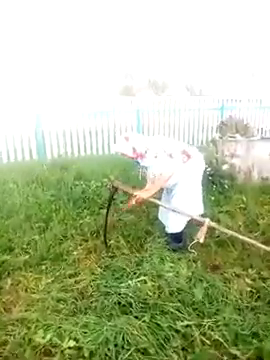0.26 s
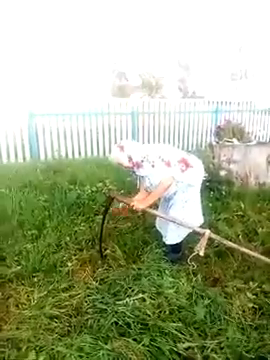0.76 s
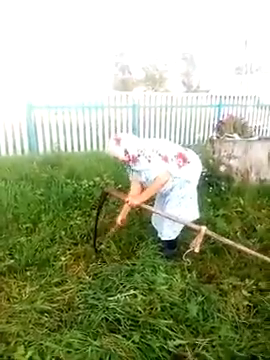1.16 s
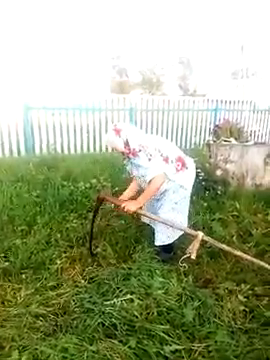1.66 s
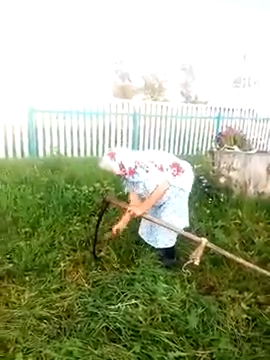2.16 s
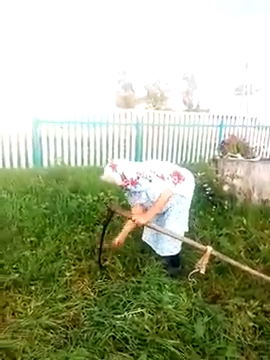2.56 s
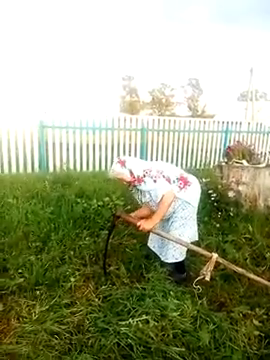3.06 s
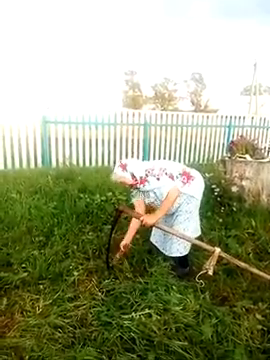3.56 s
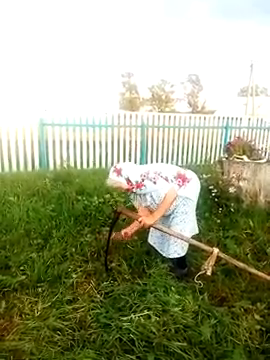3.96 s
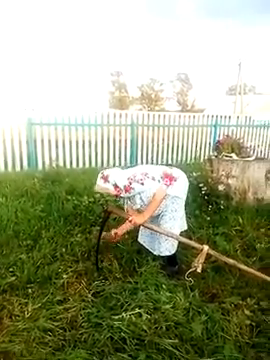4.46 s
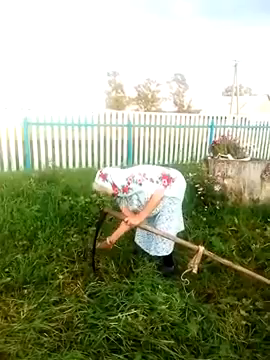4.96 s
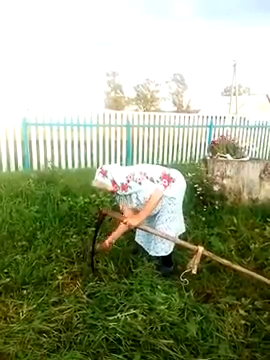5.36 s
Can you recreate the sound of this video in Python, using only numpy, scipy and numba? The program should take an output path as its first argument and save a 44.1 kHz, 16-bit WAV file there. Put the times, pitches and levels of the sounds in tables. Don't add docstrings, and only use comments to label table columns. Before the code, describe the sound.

A whetstone sharpens a hand-held scythe blade in an open yard, heard from a few metres away on a phone. A soft clack opens at 0 s, with small bounces and short scrapes; a faint touch follows at 0.5 s. Firmer clacks come at about 1.0 and 2.0 s, with a mellow touch and rattling snags at 1.5 s between them. The hardest clack lands at 2.5 s, leading into a longer gritty rasp. A dull touch at 3.1 s, a scrape near 3.4 s, a medium clack at 4.0 s and a light one at 4.6 s follow, then several quick scrapes until 5.6 s. The steel gives a short, damped, high ring. Faint brushing passes fill some gaps; a bright tap sounds at 1.3 s, soft dull ones at 3.6 s and a low thud at 4.5 s. Quiet rumble, hiss and distant engine hum continue beneath, with short dull echoes.

```python
import sys
import numpy as np
from scipy import signal
from scipy.fft import rfft, irfft, next_fast_len
from scipy.io import wavfile
from numba import njit

SR = 44100
rng = np.random.default_rng(int(sys.argv[2]) if len(sys.argv) > 2 else 0)


def level_to_linear(level):
    exponent = np.asarray(level, float) / 20
    return 10 ** exponent


def to_wav(s):
    ch = np.atleast_2d(s).T
    pcm = np.round(np.clip(ch, -1, 1) * 32767)
    wavfile.write(sys.argv[1], SR, pcm.astype(np.int16))


N = 247401

# (frequency [Hz], level [dB])
YARD_SPECTRUM = [(22, -10), (40, -10), (80, 2.5), (200, -2.5), (500, -7.5), (950, -10.5), (1300, -15.5),
                 (2000, -16), (4000, -22.5), (6600, -24), (7800, -34), (13500, -40), (14600, -31),
                 (15700, -25)]
# (time [s], level [dB])
RUMBLE_SWELL = [(0, 1), (.8, 2), (1.4, 2), (2.1, 1), (2.9, 0), (3.6, 0.5), (4.2, -1), (5, -0.5),
                (5.61, -0.5)]
# (frequency [Hz], free decay [ms], level [dB])
STRUCK_MODES = [(520, 3.3, -27), (760, 3.3, -22), (1086, 3.7, -24), (1517, 4, -25), (1740, 5, -27.5),
                (2294, 4, -12), (2675, 5.7, -23), (3214, 4, 6), (3550, 6, -20), (3850, 6.8, 7),
                (4515, 21, -1.5), (4830, 3, -3), (6210, 6.1, -13), (6485, 7.7, -11)]
# (time [s], peak [dB], main ring [Hz], middle rings [dB], high rings [dB])
LANDINGS = [
    (0.0004, -21, 2100, -12.5, -7),
    (0.5192, -27, 1990, -16, -4.5),
    (0.9807, -12, 2197, -15, -17),
    (1.5065, -23.5, 2060, -22, -6),
    (1.9994, -10.5, 2174, -16, -6),
    (2.5381, -7.5, 2150, -12.5, -6),
    (3.1303, -19.5, 1940, -24, -16),
    (3.9923, -16, 2166, -21, -16),
    (4.5665, -25.5, 2125, -19, -16),
]
# (time [s], peak [dB], main ring [Hz], upper rings [dB])
SNAGS = [(0.1141, -38, 2100, 0), (0.1795, -29, 1996, -10), (0.5447, -30, 2030, -10),
         (0.613, -33, 2010, -12), (0.6978, -29, 1920, -3), (1.0044, -38, 2320, -3),
         (1.0231, -31, 2300, -12), (1.0434, -37.5, 2050, -3), (1.2044, -32, 2160, -2),
         (1.5319, -33, 2020, -12), (1.5913, -28, 2080, -14), (1.6174, -23, 2200, -8),
         (1.6362, -19.5, 1920, -5), (2.025, -34, 2150, 0), (2.1575, -33, 2040, -14),
         (2.1765, -34, 1996, -5), (2.5636, -30, 2080, 2), (2.6369, -34, 2050, -14),
         (2.6628, -33.5, 2090, -9), (2.7711, -36, 2140, -8), (3.1522, -23.5, 2110, -19),
         (3.1782, -30.5, 2100, -14), (3.5994, -36, 2190, -12), (4.0537, -30, 2200, -8),
         (4.1650, -35, 2100, -16), (4.2602, -35, 2110, -5), (4.7526, -29, 2130, -12),
         (4.9596, -40, 2130, -5), (5.0295, -36, 2090, -3), (5.4250, -34, 2080, -2)]
# (start [s], length [s], pressure [dB], top speed [dB], extra bite at the end [dB])
STROKES = [(0.005, .070, -56, -59, 0), (0.080, .104, -55, -50, 4), (0.550, .050, -58, -65, 0),
           (0.590, .116, -52, -59, 6), (0.985, .095, -54, -66, 0), (1.060, .154, -55, -53, 9),
           (1.510, .030, -57, -62, 0), (1.558, .087, -50, -53, 11), (1.635, .037, -54, -62, 0),
           (2.000, .182, -51, -57, 6), (2.540, .245, -54, -56, 3), (3.130, .057, -57, -58, 0),
           (3.180, .070, -67, -72, 0), (3.358, .264, -55, -58, 8), (3.995, .250, -57, -57, 1),
           (4.248, .059, -53, -58, 0), (4.570, .235, -58, -58, 4), (4.958, .040, -57, -64, 0),
           (4.990, .075, -55, -58, 2), (5.055, .185, -62, -58, 9), (5.230, .055, -59, -61, 0),
           (5.280, .080, -63, -72, 0), (5.350, .090, -60, -56, 8), (5.425, .205, -58, -57, 1)]
# (time [s], level [dB])
HAND_DAMPING = [(0, -1), (.15, -5), (.6, 0), (1.1, -2), (1.6, 1), (2.1, -5), (2.7, -2), (4.2, 1), (4.7, 2),
                (5.61, 2)]
# (frequency [Hz], width [Hz], level [dB])
BLADE_MODES = [(1070, 81, -9.5), (1570, 45, -8), (1720, 160, -28), (2860, 230, -19), (3231, 60, -2),
               (3395, 200, -1), (3920, 83, 0), (4590, 90, 1), (5040, 450, -12), (6010, 100, -13),
               (6610, 70, -5), (8700, 1200, -6), (10200, 150, -19), (11800, 250, -11)]
# (frequency [Hz], level [dB])
RASP_SPECTRUM = [(880, -48), (1500, 1), (1850, -82), (2090, 9), (2940, 9.5), (3390, 14.5), (6550, 11),
                 (7500, 3.5), (9750, -46), (16500, -120)]
# (frequency [Hz], level [dB])
HISS_SPECTRUM = [(3000, -14), (5000, 1.5), (6600, 1), (7400, -7), (11900, -5), (12500, -10), (13800, -10),
                 (14300, -2), (15300, 4.5), (15800, -3)]
# (middle [s], half length [s], hiss [dB])
BRUSHES = [
    (0.74, .04, -68),
    (0.845, .06, -60),
    (2.40, .08, -65),
    (2.93, .06, -63),
    (3.08, .012, -68),
    (3.31, .06, -66),
    (3.93, .09, -70),
    (0.25, .05, -70),
    (4.88, .04, -72),
]
# (time [s], peak [dB], frequency [Hz], width [Hz])
KNOCKS = [
    (1.2723, -26, 1440, 1410),
    (1.28, -44, 1910, 900),
    (1.318, -43, 453, 403),
    (1.352, -45.5, 302, 300),
    (3.598, -46, 514, 400),
    (3.614, -45.5, 280, 250),
    (4.4653, -43, 185, 420),
]

YARD_DB, HUM_HZ, HUM_DB = -56, 76.1, -66.5
LANDING_MS, SNAG_MS, SNAG_MIDDLE_DB = 5.6, 5.0, -8
CRACK_DB, CRACK_MS, CRACK_HZ = -11, 10, 6500
GRIP_S, LIFT_DB_S, SETTLE_S, SETTLE_DB, BITE_S = .022, 900, .04, 3, .03
SPEED_UP = .5
START_SPEED_DB, STOP_DB_S, BITE_HISS = -12, 500, .1
LOW_HZ, LANDED_HZ, SAG_HZ_PER_DB, WANDER_HZ = 2090, 110, 6, 40
FLUTTER_DB, RING_BITE = 1.0, .95
NODE_DB = 3.0
PINGS_PER_S = 2200
TOP_HZ = 15720


def level(x, db):
    return x * level_to_linear(db) / np.sqrt(np.mean(x ** 2))


@njit
def ring(x, hz, width):
    y, band, low = np.empty(len(x)), 0., 0.
    for i in range(len(x)):
        g, damping = np.tan(np.pi * hz[i] / SR), width / hz[i]
        v = (band + g * (x[i] - low)) / (1 + g * (g + damping))
        band = 2 * v - band
        low += 2 * g * v
        y[i] = damping * v
    return y


def colour(x, points):
    hz, db = np.transpose(points)
    size = next_fast_len(len(x))
    f = np.maximum(np.arange(size // 2 + 1) * SR / size, 1)
    gain = level_to_linear(np.interp(np.log(f), np.log(hz), db))
    return irfft(rfft(x, size) * gain, size)[:len(x)]


def walk(rate):
    return 1.22 * np.interp(np.arange(N) * rate / SR, np.arange(1000), rng.standard_normal(1000))


def yard():
    air = level(colour(rng.standard_normal(N), YARD_SPECTRUM), YARD_DB)
    rumble = signal.sosfilt(signal.butter(1, 1500, fs=SR, output="sos"), air)
    swell_db = np.interp(np.arange(N) / SR, *np.transpose(RUMBLE_SWELL)) + .8 * walk(5)
    hum = ring(rng.standard_normal(N), HUM_HZ * (1 + 0.013 * walk(1.42)), 2.2)
    return air + (level_to_linear(swell_db) - 1) * rumble + level(hum, HUM_DB)


def blows(size=1400):
    out, ms = np.zeros(N + size), np.arange(size) / SR * 1000
    modes = np.array([(0, 7.7, 0), *STRUCK_MODES])
    landings = [(*row, LANDING_MS) for row in LANDINGS]
    snags = [(s, db, hz, up + SNAG_MIDDLE_DB, up, SNAG_MS) for s, db, hz, up in SNAGS]
    for s, db, low_hz, mid_db, high_db, contact_ms in landings + snags:
        gain, detune, phase, rattle = rng.standard_normal((len(modes), 4)).T[:, :, None]
        hz, decay_ms, mode_db = modes.T[:, :, None]
        hz = np.where(hz == 0, low_hz, hz * (1 + 0.023 * detune))
        share_db = np.select([hz < 2800, hz < 4300], [0, mid_db], high_db)
        rise = np.minimum(ms / (0.89 * level_to_linear(-.3 * (db + 12))), 1) ** 0.24
        chatter = 1 + 0.62 * np.sin(1.46 * ms * (1 + 0.28 * rattle) + 9 * gain)
        press = np.exp(-(ms / max(contact_ms, .3)) ** 3) * chatter
        shape = rise * (press + 0.11 * np.exp(-ms / np.maximum(decay_ms, .5)))
        tone = np.sin(2 * np.pi * hz * ms / 1000 + 9 * phase)
        y = (level_to_linear(mode_db + share_db + 2.0 * gain) * shape * tone).sum(axis=0)
        crack = ring(rng.standard_normal(size), np.full(size, float(CRACK_HZ)), 9000.)
        crack_shape = rise * (press[0] + .2 * np.exp(-ms / CRACK_MS))
        y += level_to_linear(high_db + CRACK_DB) * crack_shape * crack
        i = int(s * SR)
        out[i:i + size] += level_to_linear(db - 11.5) * y
    return out[:N]


def hand():
    t = np.arange(0, N / SR + .002, .001)
    start, length, press_db, speed_db, bite_db = np.array(STROKES).T[:, :, None]
    since, left = t - start, start + length - t
    grip_db = 20 * np.log10(np.clip(since / GRIP_S, 1e-3, 1))
    settle = np.exp(-np.maximum(since, 0) / SETTLE_S)
    bite = bite_db * np.exp(-np.maximum(left, 0) / BITE_S)
    lifted = np.minimum(left, 0)
    press = press_db + grip_db + SETTLE_DB * settle + bite + LIFT_DB_S * lifted
    slow = np.clip(1 - since / (SPEED_UP * length), 0, 1)
    speed = speed_db + grip_db + START_SPEED_DB * slow + BITE_HISS * bite + STOP_DB_S * lifted
    sharp = LANDED_HZ * np.take_along_axis(settle, press.argmax(axis=0)[None], axis=0)[0]
    press, speed = press.max(axis=0), speed.max(axis=0)
    sag = SAG_HZ_PER_DB * np.clip(press + 55, -10, 20)
    curves = (press, speed, LOW_HZ + sharp - sag)
    press, speed, hz = (np.interp(np.arange(N) / SR, t, v) for v in curves)
    flutter = FLUTTER_DB * walk(14)
    return press + flutter, speed + flutter, hz + WANDER_HZ * walk(25)


def grit(chatter_db, chatter_hz):
    size_db = 2.5 * np.minimum(rng.exponential(size=N), 4)
    grains = rng.standard_normal(N) * level_to_linear(size_db)
    return level(grains * level_to_linear(chatter_db * walk(chatter_hz)), 0)


@njit
def pings(start, hz, cycles, size, count):
    out = np.zeros(count + 2048)
    for k in range(len(start)):
        z, turn = size[k] + 0j, np.exp((2j * np.pi - 1 / cycles[k]) * hz[k] / SR)
        for i in range(min(int(5 * cycles[k] * SR / hz[k]), 2048)):
            out[start[k] + i] += z.imag
            z *= turn
    return out[:count]


def rasp(db):
    when, where, length, size = rng.random((N * PINGS_PER_S // SR, 4)).T
    start = (when * N).astype(np.int64)
    sizes = level_to_linear(db[start] - 4.0 * np.log(size + .02))
    plucks = pings(start, 2300 + 5000 * where, 3.3 + 25.0 * length ** 2, sizes, count=N)
    return colour(plucks, RASP_SPECTRUM)


def brushing():
    middle, half, db = np.array(BRUSHES).T[:, :, None]
    t = np.arange(0, N / SR + .002, .002)
    swells = level_to_linear(db) * np.exp(-((t - middle) / half) ** 2)
    return np.interp(np.arange(N) / SR, t, swells.sum(axis=0))


def strokes():
    upper_db, hiss_db, low_hz = hand()
    damping_db = np.interp(np.arange(N) / SR, *np.transpose(HAND_DAMPING))
    low_db = upper_db + damping_db - (1 - RING_BITE) * np.maximum(upper_db + 54, 0)
    force = grit(chatter_db=1.5, chatter_hz=90)
    core = ring(force * level_to_linear(low_db + 2.5 * walk(70)), low_hz, 85.)
    skirt = ring(force * level_to_linear(low_db), low_hz * 1.074, 250.)
    low = level(core, 0) + level(skirt, -18)
    rings = []
    for k, (hz, width, db) in enumerate(BLADE_MODES):
        drive_db = upper_db if hz < 7300 else (upper_db + hiss_db) / 2
        push = force * level_to_linear(drive_db + db + NODE_DB * walk(35))
        mode = ring(push, hz * (1 + 0.0088 * walk(6)), float(width))
        rings.append((-1) ** k * mode / np.sqrt(width))
    upper = level(sum(rings[:11]), -3) + level(rasp(upper_db), -4)
    scrape = colour(force * level_to_linear(hiss_db + 1.4 * walk(35)), HISS_SPECTRUM)
    hiss = level(scrape, 0) + level(sum(rings[11:]), -6)
    brush = level(colour(grit(chatter_db=3.0, chatter_hz=49.8), HISS_SPECTRUM), 0)
    return level(low, -54.5) + level(upper, -56) + level(hiss, -60.5) + brushing() * brush


def knocks(size=2000):
    out, t = np.zeros(N), np.arange(size) / SR
    for s, db, hz, width in KNOCKS:
        tap = np.exp(-((t * hz - 1) / .18) ** 2)
        centre = np.full(size, float(hz))
        y = ring(ring(tap, centre, float(width)), centre, float(width))
        i = int((s - 1 / hz) * SR)
        out[i:i + size] += level_to_linear(db) * y / np.abs(y).max()
    return out


def scene():
    near = blows() + strokes() + knocks()
    echo = np.zeros(N)
    for lag_s, db in ((.0045, -10), (.012, -58.5), (.024, -25)):
        lag = int(lag_s * SR)
        echo[lag:] += level_to_linear(db) * near[:-lag]
    dull_echo = ring(echo, np.full(N, 2800.), 5000.0)
    return (near + dull_echo + yard())[None]


def top_cut(x):
    return signal.sosfilt(signal.butter(12, 16530, fs=SR, output="sos"), x)


def record(dry):
    cut = signal.sosfilt(signal.ellip(8, .2, 36, TOP_HZ, fs=SR, output="sos"), dry)
    return top_cut(cut)


dry = scene()
out = record(dry)
to_wav(out)
```